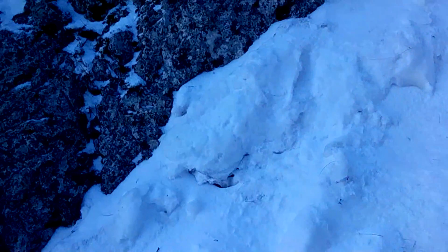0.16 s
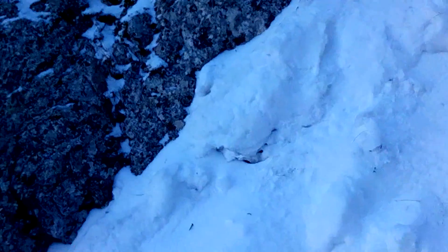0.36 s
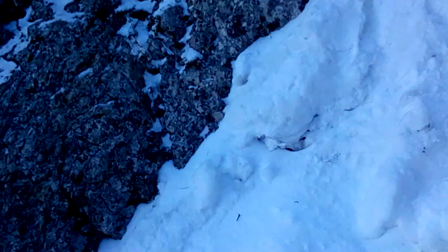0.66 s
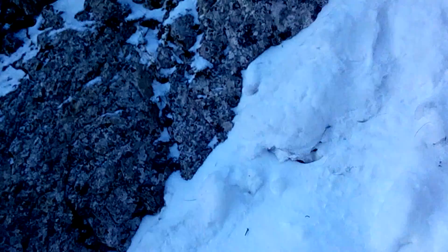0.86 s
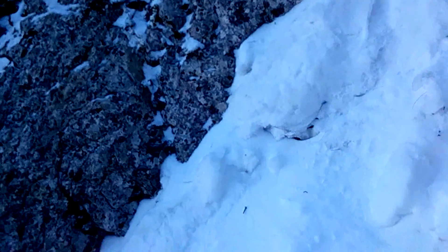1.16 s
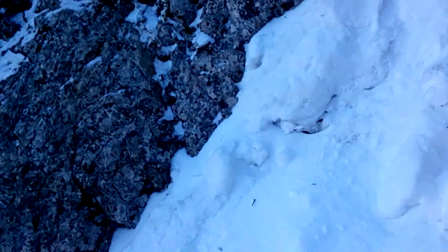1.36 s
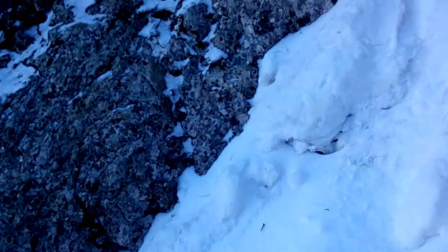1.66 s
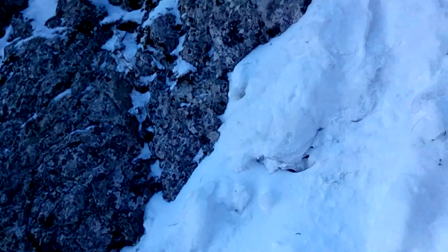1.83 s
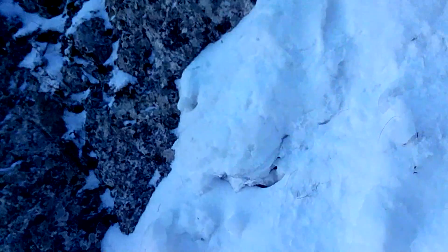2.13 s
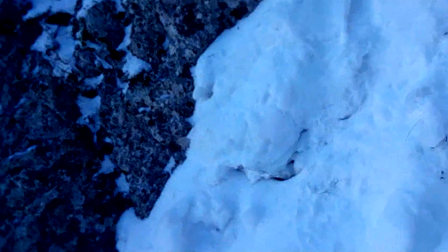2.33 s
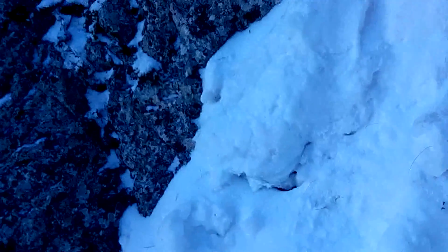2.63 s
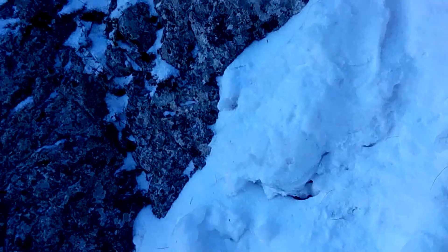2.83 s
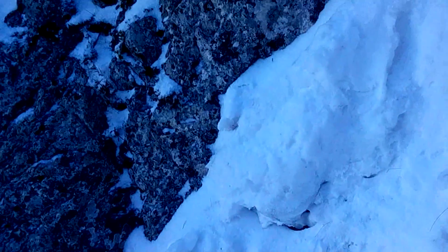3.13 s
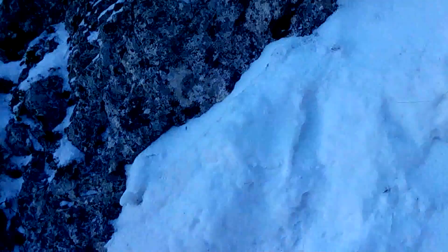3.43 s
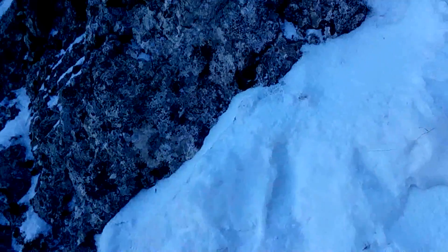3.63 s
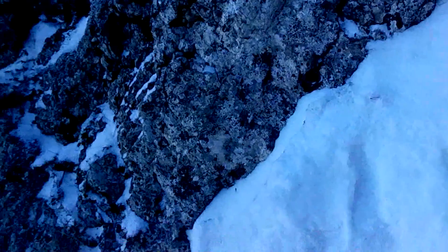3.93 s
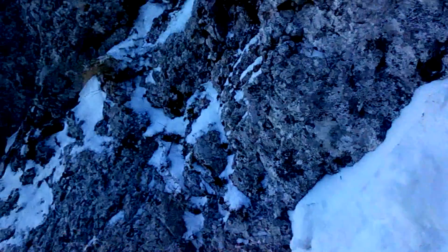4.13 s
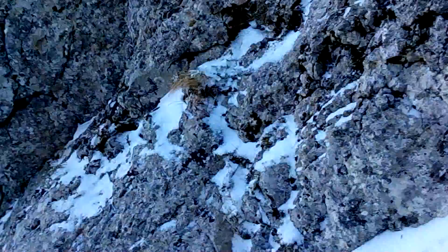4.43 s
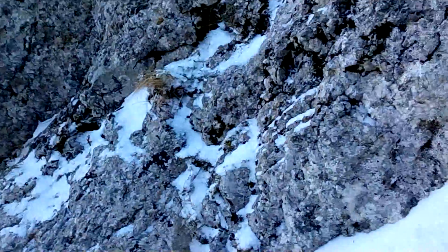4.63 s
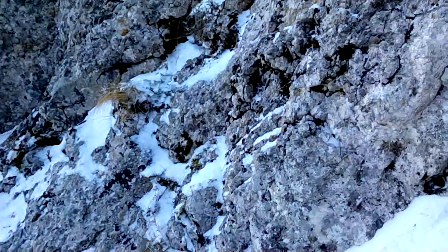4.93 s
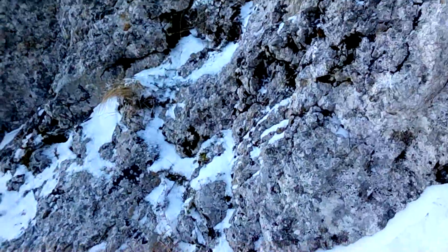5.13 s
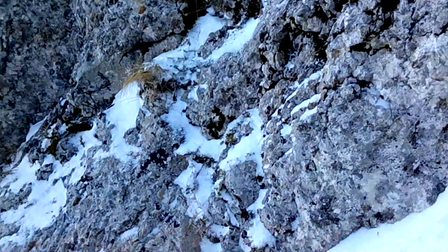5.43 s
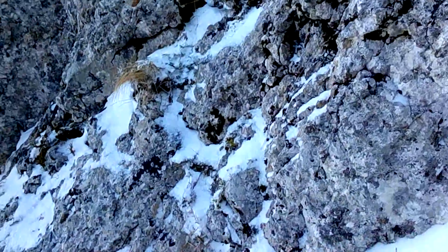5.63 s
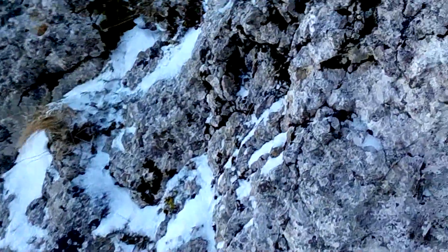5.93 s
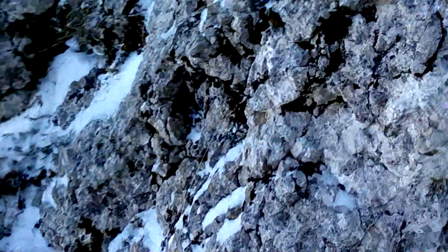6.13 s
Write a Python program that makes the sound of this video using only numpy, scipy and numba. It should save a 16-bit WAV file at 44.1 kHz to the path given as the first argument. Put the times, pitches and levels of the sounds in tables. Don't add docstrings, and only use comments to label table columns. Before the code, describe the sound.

Close on a steep icy slope, an axe scrapes and stabs at hard snow: clusters of brittle cracks, dragged steel ringing faintly, dull thumps through the camera case. Then spiked boots step up with sharp bites and short steel pings, loose grains trickling between, scraping continuing to the end over very faint air and hiss.

```python
import sys
import numpy as np
from scipy import signal
from scipy.fft import rfft, irfft, next_fast_len
from scipy.io import wavfile
from scipy.ndimage import uniform_filter1d, map_coordinates
from numba import njit

SR = 44100
rng = np.random.default_rng(int(sys.argv[2]) if len(sys.argv) > 2 else 0)


def linear_from_db(decibels):
    return 10 ** (np.asarray(decibels, float) / 20)


def store_wav(level_fs):
    pcm = np.round(np.clip(np.atleast_2d(level_fs), -1, 1) * 32767)
    wavfile.write(sys.argv[1], SR, pcm.T.astype(np.int16))


N = 276815

# (frequency [Hz], density [dB per Hz])
AIR_SPECTRUM = [(24, -28.5), (40, -1.5), (299, -7.5), (385, -13.5), (496, -30.5), (1340, -22),
                (1540, -27.5), (4670, -18), (10000, -53.5), (13000, -93.5), (22000, -120)]
# (frequency [Hz], density [dB per Hz])
CRUST_SPECTRUM = [(240, -17), (400, -11), (1610, -7), (2430, -7.5), (2750, -5), (3470, -5.5), (3870, -5),
                  (4690, -6), (5090, -3), (6080, -5), (6510, -8.5), (7880, -29.5), (9540, -28),
                  (10500, -55), (13600, -77.5), (22000, -120)]
# (frequency [Hz], side over mid [dB])
SIDE_OVER_MID = [(60, -14.5), (110, -10), (190, -19), (330, -4.5), (580, -11.5), (1030, -8), (1820, -5.5),
                 (3220, -5), (5690, 4), (10000, 5)]
# (frequency [Hz], share of the side that opposes the left port [0-1])
RIGHTWARD_SHARE = [(600, -.1), (1800, -.1), (3200, 0.26), (5500, 0.95), (9000, 0.3)]
# (start [s], end [s], fine crust [dB], sag to the end [dB], coarse lumps over fines [dB])
SCRAPES = [(0.0, 0.202, -46, 1.5, 4), (0.535, 0.566, -31, 4, -13), (0.57, 0.668, -33, -10, -7),
           (1.045, 1.108, -48, 2, -4.5), (1.131, 1.214, -43, 3.5, -9), (1.268, 1.337, -43.5, -3, 2.5),
           (1.362, 1.436, -51.5, 0, -3), (1.441, 1.524, -47, 2, 4), (1.754, 1.988, -50, 5, -5),
           (1.783, 1.82, -40, 0, -8), (1.84, 1.921, -38, 0, -9.5), (2.062, 2.237, -44, -3.5, -1),
           (2.598, 2.82, -43, -4, -6), (2.868, 2.9, -45.5, -1.5, 8), (3.022, 3.06, -48.5, -0.5, 7.5),
           (3.153, 3.189, -26, -1, -16), (3.188, 3.249, -41.5, -4.5, -0.5), (3.68, 3.712, -54, -0.5, -1),
           (4.318, 4.362, -26, 3, -17), (4.368, 4.948, -38, -13.5, -7), (4.62, 4.8, -44, -2.5, -11.5),
           (4.962, 5.172, -51, 4, -7), (5.753, 5.999, -48, -4, 0), (6.041, 6.255, -49, 3, -6)]
# (time [s], fine crust [dB], time to fade 20 dB [s], coarse lumps over fines [dB])
STABS = [(0.19, -44, .09, 0), (0.258, -47, .035, -14), (0.683, -37.5, .055, -11), (1.588, -41, 0.05, 2),
         (1.664, -30, 0.0448, -7.5), (2.256, -32.5, 0.2247, -14), (3.5, -39, 0.06, -14.5),
         (4.03, -52, 0.2, 2.5), (4.143, -25.5, .065, -10), (5.343, -49, 0.11, -1.5), (6.016, -36, 0.03, -7)]
# (peak [s], fine crust [dB], time to build 20 dB [s], time to fade 20 dB [s], coarse lumps over fines [dB])
SHOVES = [(0.568, -23, .025, .022, -18), (1.245, -35, .14, 0.1, -8), (1.831, -30, 0.03, 0.05, -10),
          (2.555, -33.5, 0.36, .07, -11), (3.3, -51, .1, .12, -5.5), (3.62, -48.5, 0.03, 0.03, 0.5),
          (4.32, -32, 0.1747, 0.03, -4), (4.575, -33, 0.1255, .05, -14), (5.21, -39, 0.06, 0.0244, -1),
          (5.475, -44, 0.04, 0.02, -7.5), (5.885, -43, 0.13, .12, -10), (6.277, -38, 0.0669, .05, 1)]
# (start [s], end [s], fine crust [dB], sag to the end [dB], coarse lumps over fines [dB])
TRICKLES = [
    (0.25, 0.505, -61, -1, -1),
    (0.745, 1.05, -66, 3.5, -2),
    (1.99, 2.06, -50, 0.5, -12.5),
    (2.82, 2.866, -54, 0, -3),
    (2.9, 3.01, -54.5, -6, -0.5),
    (3.07, 3.143, -58, -8, 0),
    (3.383, 3.49, -64, -2, 3),
    (3.723, 4.004, -64, 1.5, 0.5),
    (5.231, 5.327, -53.5, -7, -5),
    (5.5, 5.67, -68, -5, 0),
]
# (time [s], grittiness [dB])
GROUND_GRIT = [(0.17, -8.5), (0.3, 0), (0.9, 0.5), (1.09, 6.5), (1.15, 2.5), (1.45, 0), (1.9, 0), (2.2, 3),
               (2.9, 1), (3.3, 2.5), (3.58, -4), (3.7, 2), (4.13, -1.5), (4.4, 2), (5.16, 2.5), (5.4, -1.5),
               (6.28, 1)]
# (start [s], end [s], ring over crunch [dB], modes left free by the grip [Hz])
DRAGS = [
    (0, 0.256, 2, 5200),
    (1.142, 1.35, -4, 5050),
    (1.666, 1.993, 6, 3300),
    (2.267, 2.595, 4, 5000),
    (2.588, 2.837, 6.5, 3700),
    (3.028, 3.272, -3, 4530),
    (3.472, 3.647, -4, 5300),
    (4.385, 4.797, 0, 5500),
    (5.76, 5.99, -7, 5800),
    (6.019, 6.22, 2, 4050),
]
# (frequency [Hz], width [Hz], level [dB])
STEEL_MODES = [(1880, 40, 0), (2745, 62, -5), (3120, 37, -9.5), (3880, 150, -7), (5120, 72, -4.5),
               (5460, 43, -4), (5800, 70, -1)]
# (time [s], rumble [dB], knocking over that of the breaking lumps [dB])
CASE_CONTACT = [(0.15, -40, -7), (.35, -40, 6), (.5, -42, 2), (.66, -49.5, 4.5), (.85, -50.5, 1.5),
                (1.45, -45, 4), (1.8, -47, -6.5), (2.05, -52, -1.5), (2.2, -49, 0), (2.4, -49, 10),
                (2.58, -57, 13), (2.66, -60, -2.5), (2.84, -59, -2), (3.2, -47.5, 6), (3.32, -47, -3),
                (3.65, -50.5, -1), (4.15, -50, 3), (4.45, -47, 3), (4.74, -42, 1.5), (4.86, -57, -1.5),
                (5.4, -55.5, 2), (5.95, -50.5, -1), (6.12, -59, -1)]
# (time [s], peak [dB], pitch [Hz], length [cycles])
THUMPS = [(0.101, -18.5, 125, 1.7), (0.286, -15, 89.7, 1.6), (0.476, -16.5, 99, 1.4),
          (0.557, -19.5, 218, 2.3), (0.612, -25, 229, 2.9), (1.22, -26, 214, 3.1), (1.3, -27.5, 240, 2.5),
          (1.47, -27, 120, 1.7), (2.416, -19.5, 201, 1.3), (2.49, -25, 253, 2.2), (2.865, -33, 95, 1.8),
          (2.867, -24.5, 265, 2.9), (2.879, -18, 251, 2.6), (3.024, -22, 243, 2.4), (3.046, -26.5, 160, 2),
          (3.128, -32.5, 75.4, 2.4), (3.221, -26.5, 116, 2), (3.844, -11, 112, 0.98),
          (3.873, -21.5, 121, 1.2), (3.958, -31.5, 107, 3), (4.25, -17.5, 200, 1.3), (4.335, -26, 100, 2.3),
          (4.739, -21.5, 128, 2.05), (5.165, -22, 165, 2.1), (5.178, -21, 142, 1.8), (5.2, -19, 284, 2.6),
          (5.34, -34, 201, 1.8), (5.968, -29, 85, 1.5), (6.013, -28, 77, 1.7), (6.236, -28.5, 143, 1.7),
          (6.251, -26, 172, 2.2)]
# (time [s], peak [dB], centre [Hz], ring [s])
AXE_CRACKS = [(0.178, -24, 5440, 0.018), (0.564, -20, 6100, 0.014), (0.592, -9, 3400, 0.0083),
              (0.6146, -14, 5640, 0.015), (0.6826, -19, 3030, 0.022), (1.204, -16, 3200, 0.02),
              (1.265, -14, 4570, 0.015), (1.3256, -24, 4230, 0.02), (1.362, -22.5, 3700, 0.02),
              (1.59, -29, 2930, 0.017), (1.596, -31, 1000, 0.02), (1.6656, -12, 4180, 0.017),
              (1.732, -40, 5830, 0.018), (1.755, -33, 2620, 0.014), (1.831, -19, 4800, 0.025),
              (2.0735, -16, 4400, 0.024), (2.2177, -28, 3330, 0.02), (2.258, -15, 6110, 0.034),
              (2.3126, -13, 5170, 0.013), (2.467, -13, 4770, 0.02), (2.5364, -16.5, 4020, 0.02),
              (2.5505, -7, 4260, 0.029), (2.5764, -11.5, 3940, 0.026), ]
# (time [s], peak [dB], centre [Hz], ring [s])
STEP_CRACKS = [(2.8955, -24.5, 4550, 0.02), (3.0235, -32, 2870, 0.028), (3.3467, -31.5, 3150, 0.014),
               (3.4105, -36, 2240, 0.022), (3.503, -32, 5300, 0.02), (3.681, -30.5, 3570, 0.02),
               (3.811, -35, 5120, 0.024), (3.8915, -33.5, 3330, 0.014), (3.974, -29, 2880, 0.026),
               (4.0317, -27, 3330, 0.012), (4.109, -30, 2200, 0.02), (4.1452, -10.5, 5960, 0.028),
               (4.186, -19.5, 5940, 0.012), (4.2547, -21.5, 3530, 0.026), (4.3328, -3, 5120, 0.014),
               (4.563, -16, 6100, 0.011), (4.596, -29, 5030, 0.017), (4.6186, -22, 3240, 0.028),
               (4.834, -25, 3000, 0.025), (5.345, -29, 1880, 0.023), (5.4006, -29, 3170, 0.018),
               (5.4713, -19, 5770, 0.015), (6.0186, -33, 5300, 0.026), (6.1277, -31, 1700, 0.018),
               (6.2322, -21, 4170, 0.02)]
# (time [s], peak [dB], centre [Hz], ring [s])
CRACKLES = [(0.259, -33, 4970, 0.015), (0.318, -42, 4080, 0.015), (0.349, -38, 1260, 0.015),
            (0.449, -39, 4110, 0.015), (0.543, -13, 5730, 0.015), (0.657, -25, 5270, 0.015),
            (0.697, -27, 5660, 0.015), (0.781, -43, 5840, 0.015), (1.025, -36, 3140, 0.015),
            (1.066, -29, 2870, 0.015), (1.174, -25, 5560, 0.015), (1.217, -16, 3310, 0.015),
            (1.234, -19, 4910, 0.015), (1.281, -22, 1120, 0.015), (1.339, -24, 1090, 0.015),
            (1.446, -30, 3450, 0.015), (1.499, -25, 1070, 0.015), (1.519, -23, 3450, 0.015),
            (1.614, -39, 1560, 0.015), (1.785, -19, 5100, 0.015), (2.279, -16, 6140, 0.015),
            (2.355, -22, 3900, 0.015), (2.483, -20, 2880, 0.015), (2.524, -15, 3900, 0.015),
            (2.561, -15, 3910, 0.015), (2.602, -22, 3980, 0.015), (2.98, -35, 2430, 0.015),
            (3.295, -29, 5740, 0.015), (3.598, -32, 1900, 0.015), (3.616, -29, 1890, 0.015),
            (4.055, -31, 2870, 0.015), (4.218, -28, 3210, 0.015), (4.337, -8, 3950, 0.015),
            (4.344, -8, 6160, 0.015), (4.647, -22, 3190, 0.015), (4.699, -28, 3930, 0.015),
            (5.017, -32, 3850, 0.015), (5.074, -30, 5370, 0.015), (5.125, -28, 2690, 0.015),
            (5.15, -28, 3900, 0.015), (5.195, -24, 3450, 0.015), (5.386, -30, 3260, 0.015),
            (5.453, -27, 5440, 0.015), (5.522, -43, 4610, 0.015), (5.865, -26, 6210, 0.015),
            (5.95, -31, 1080, 0.015), (5.965, -30, 2240, 0.015), (5.979, -34, 2720, 0.015),
            (6.06, -30, 5460, 0.015), (6.157, -31, 5170, 0.015)]
# (start [s], end [s], level over crunch [dB], first pitch [Hz], last pitch [Hz])
CHATTER = [(0.535, 0.58, 0, 5900, 5500), (1.05, 1.105, 0, 2900, 2900), (1.08, 1.115, 0, 2150, 2100),
           (1.13, 1.2, -2, 5700, 5300), (1.14, 1.22, 0, 4900, 3500), (1.135, 1.17, -2, 2700, 3100),
           (1.22, 1.27, 0, 4700, 5300), (1.78, 1.93, 0, 1870, 1950), (1.78, 1.86, 0, 5050, 5150),
           (1.78, 1.96, 0, 4000, 3950), (1.79, 1.85, -2, 3150, 3100), (2.255, 2.3, 0, 6150, 6100),
           (2.3, 2.4, 0, 3900, 3700), (2.45, 2.6, 1, 4000, 4200), (2.62, 2.82, -2, 2000, 2100),
           (2.62, 2.82, 0, 4200, 3900), (2.65, 2.82, -3, 5400, 5400), (3.155, 3.195, 0, 5600, 5300),
           (3.2, 3.25, 0, 3400, 3700), (3.505, 3.575, 0, 6200, 5900), (4.315, 4.37, 3.5, 5000, 6400),
           (4.325, 4.35, 5, 3900, 3900), (4.5, 4.75, 0, 3200, 3200), (4.48, 4.62, 0, 5300, 5500),
           (4.55, 4.6, 0, 6000, 6300), (4.64, 4.74, -2, 4300, 4300), (5.755, 5.94, 0, 5400, 5450),
           (5.82, 5.92, 0, 5900, 6300), (5.86, 5.95, -2, 4200, 4200), (5.86, 5.93, -2, 2100, 1900),
           (6.018, 6.045, 2, 5500, 5300), (6.06, 6.2, 2, 3850, 3900), (6.08, 6.2, 0, 5500, 5100),
           (6.08, 6.2, -3, 2770, 2750)]
# (time [s], peak [dB], pitch [Hz], ring to -60 dB [s])
PINGS = [(1.663, -37, 2720, 0.1), (1.662, -24.5, 3150, 0.1), (1.666, -19, 3940, 0.058),
         (1.664, -20, 5150, 0.053), (1.671, -27.5, 1917, 0.14), (3.502, -39, 1935, 0.13),
         (3.56, -44, 1910, .1), (3.604, -34, 1890, .1), (3.502, -29, 5430, 0.09), (2.252, -23, 6180, 0.21),
         (4.146, -18, 6040, 0.13), (4.144, -9.5, 5400, 0.035), (4.35, -15, 6200, 0.14),
         (4.147, -30, 1000, .12), (4.147, -34, 1950, .12), (3.6, -38, 5430, .1), (4.146, -18, 5680, .07)]


def curve(rows, t):
    s, *columns = np.transpose(rows)
    return [np.interp(t, s, c) for c in columns]


def by_pitch(rows, hz):
    f, value = np.transpose(rows)
    return np.interp(np.log(np.maximum(hz, 1)), np.log(f), value)


def colour(x, rows):
    size = next_fast_len(N + 8192, real=True)
    hz = np.arange(size // 2 + 1) * SR / size
    return irfft(rfft(x, size) * linear_from_db(by_pitch(rows, hz)), size)[..., :N]


def unit(x):
    return x / np.sqrt(np.mean(x[0] ** 2))


@njit
def grains(start, hz, cycles, size, side):
    out = np.zeros((2, N))
    for g in range(len(start)):
        span = cycles[g] * SR / hz[g] / 3
        p = np.exp(2j * np.pi * hz[g] / SR - 1 / span)
        z = size[g] * np.e / span + 0j
        for k in range(min(int(7 * span), N - int(start[g]))):
            out[0, int(start[g]) + k] += k * z.imag
            out[1, int(start[g]) + k] += k * (z * side[g]).imag
            z *= p
    return out


def direction(hz, chance, skew=.45):
    lean = np.clip(by_pitch(RIGHTWARD_SHARE, hz) * .9, -.97, .97)
    return np.sqrt(1 - lean ** 2) * (np.sqrt(1 - skew ** 2) * chance - 1j * skew) - lean


def shards(t, size, centre_hz, spread_oct, scatter_s, cycles, count):
    u = rng.random((len(t), count, 3))
    n = rng.standard_normal((len(t), count, 2))
    order = rng.permuted(np.tile(np.arange(count), (len(t), 1)), axis=1)
    place = (order + u[..., 0]) / count
    hz = np.clip(np.reshape(centre_hz, (-1, 1)) * 2 ** (spread_oct * (2 * place - 1)), 300, 10500)
    late = -np.log(1 - (np.arange(count) + u[..., 1]) / count) * np.reshape(scatter_s, (-1, 1))
    when = t[:, None] + late
    turns = cycles * 2 ** (1.68 * u[..., 2])
    uneven = np.sign(n[..., 0]) * (0.77 + 0.38 * abs(n[..., 0]))
    weight = size[:, None] * uneven * hz / 4000 / np.sqrt(turns / 3)
    side = direction(hz, n[..., 1])
    return when.ravel(), hz.ravel(), weight.ravel(), side.ravel(), turns.ravel()


def air():
    return linear_from_db(-52.5 - 10) * unit(colour(rng.standard_normal((2, N)), AIR_SPECTRUM))


def load(t):
    onset_s, release_s = .002, 0.019
    lumps_linger = 1.27
    now = np.arange(0, N / SR, .001)
    s, db, fade_s, coarse_db = np.array(STABS).T[..., None]
    shapes = [(db, 0, s, s, onset_s, fade_s, coarse_db)]
    s, db, build_s, fade_s, coarse_db = np.array(SHOVES).T[..., None]
    shapes += [(db, 0, s, s, build_s, fade_s, coarse_db)]
    s, end, db, sag_db, coarse_db = np.array(SCRAPES + TRICKLES).T[..., None]
    sag_now_db = sag_db * np.clip((now - s) / (end - s), 0, 1)
    shapes += [(db, sag_now_db, s, end, onset_s, release_s, coarse_db)]
    fines = lumps = linear_from_db(2 * -77)
    for db, sag_db, s, end, rise_s, fall_s, coarse_db in shapes:
        before = -20 * np.maximum(s - now, 0) / rise_s
        after = sag_db - 20 * np.maximum(now - end, 0) / fall_s
        fines = fines + np.sum(linear_from_db(2 * (db + before + after)), axis=0)
        lumps = lumps + np.sum(linear_from_db(2 * (db + coarse_db + before + after / lumps_linger)), axis=0)
    load_db = np.interp(t, now, 10 * np.log10(fines))
    lumps_db = np.interp(t, now, 10 * np.log10(lumps / fines))
    grit_db = 4 + .55 * lumps_db + curve(GROUND_GRIT, t)[0]
    return load_db, lumps_db, grit_db


def crust(rate=1500, spread_db=2.0, cycles=1.92, scatter_s=.0018, patchy_db=4.2):
    t = np.sort(rng.random(int(rate * N / SR))) * N / SR
    size = linear_from_db(spread_db * np.minimum(rng.exponential(size=len(t)), 5))
    when, hz, weight, side, turns = shards(t, size, 2180.0, 2.254, scatter_s, cycles, count=8)
    weight /= np.sqrt(np.mean(size ** 2))
    load_db, lumps_db, grit_db = load(when)
    coarse = np.clip(np.log2(2300 / hz) / 1.6, 0, 1)
    middle = np.clip(np.log2(5200 / hz) / 0.21, 0, 1) * (1 - coarse)
    patches = map_coordinates(rng.standard_normal((160, 24)), [when / .04, 4 * np.log2(hz / 290)], order=1)
    weight *= linear_from_db(patchy_db * patches)
    level_db = load_db + coarse * (lumps_db + 7) + middle * (grit_db - 0.5) + 4.0
    return grains(when * SR, hz, turns, weight * linear_from_db(level_db), side)


def ring(x, hz, width):
    r = np.exp(-np.pi * width / SR)
    gain = (1 - r * r) / 2
    return signal.lfilter([gain, 0, -gain], [1, -2 * r * np.cos(2 * np.pi * hz / SR), r * r], x)


def dragged_steel(drive, reach_oct=0.77):
    t, slow = np.arange(N) / SR, np.arange(0, N / SR, .005)
    start, end, ring_db, free_hz = np.array(DRAGS).T[..., None]
    contact = np.clip(np.minimum(slow - start + 0.0065, end - slow) / 0.032, 0, 1)
    out = np.zeros((2, N))
    for hz, width, db in STEEL_MODES:
        damping_db = 7.2 * (np.log2(hz / free_hz) / reach_oct) ** 2
        free = np.sum(contact * linear_from_db(ring_db + 5.5 - damping_db), axis=0)
        shift_db = 2.5 * np.interp(slow, np.arange(80) * .09, rng.standard_normal(80))
        out += ring(drive * np.interp(t, slow, free * linear_from_db(db + shift_db)), hz, width)
    return out


def rubbing(most_db=-38):
    t = np.arange(N) / SR
    rumble_db, knock_db = curve(CASE_CONTACT, t)
    load_db, lumps_db, _ = load(t)
    lumps_db = np.maximum(load_db + lumps_db, -66)
    knock_db = knock_db - 43.5 + 0.87 * (lumps_db + 45)
    rumble_db = rumble_db + 0.29 * (uniform_filter1d(lumps_db, SR // 20) + 50.5)
    rumble_db = np.minimum(rumble_db + 3, most_db)
    out = np.zeros((2, N))
    for db, hz, octaves, rate, cycles in [(rumble_db, 90, .6, 200, 2.4), (knock_db, 250, .9, 650, 2.1)]:
        count = int(rate * N / SR)
        u, n = rng.random((2, count)), rng.standard_normal((2, count))
        pitch = hz * 2 ** (octaves * (2 * u[1] - 1))
        wavelets = grains(u[0] * N, pitch, np.full(count, cycles), n[0] * linear_from_db(1.2 * n[1]), n[1] + 0j)
        out += linear_from_db(db) * unit(wavelets)
    return out


def blows():
    t, db, hz, cycles = np.transpose(THUMPS)
    return grains(t * SR, hz, cycles, linear_from_db(db - 3.5), np.full(len(t), .7 + 0j))


def housing(side_db=-20):
    return (rubbing() + blows()) * linear_from_db([[0], [side_db]])


def cracks():
    t, db, centre_hz, ring_s = np.transpose(AXE_CRACKS + STEP_CRACKS + CRACKLES)
    db[-len(CRACKLES):] -= 4
    when, hz, weight, side, turns = shards(t, linear_from_db(db), centre_hz, 0.92, ring_s / 5, 0.69, count=16)
    fade = linear_from_db(-5.5 - 30 * (when - np.repeat(t, 16)) / np.repeat(ring_s, 16))
    weight *= fade * np.repeat(4000 / centre_hz, 16)
    tick = grains(t * SR, centre_hz, np.full(len(t), 1.1), linear_from_db(db + 4.5), direction(centre_hz, 0) / 0.6)
    return tick + grains(when * SR, hz, turns, weight, side)


def chatter(cycles=28.0, stray=.018, spread_db=3.0, count=32):
    start, end, db, from_hz, to_hz = np.array(CHATTER).T[..., None]
    u = rng.random((len(start), count))
    n = rng.standard_normal((len(start), count, 3))
    along = (np.arange(count) + u) / count
    when = start + along * (end - start)
    hz = (from_hz + along * (to_hz - from_hz)) * (1 + stray * n[..., 0])
    size = linear_from_db(db + 2.5 + load(when)[0] + spread_db * n[..., 1])
    size *= np.sin(np.pi * along) ** .3 * hz / 4000 * np.sqrt(200 * (end - start) / count)
    side = direction(hz, n[..., 2])
    return grains(when.ravel() * SR, hz.ravel(), np.full(hz.size, cycles), size.ravel(), side.ravel())


def struck_steel():
    out = np.zeros((2, N))
    age = np.arange(int(.3 * SR)) / SR
    for s, db, hz, ring_s in PINGS:
        wobble = uniform_filter1d(rng.standard_normal(len(age)), 200) * hz / 60000
        tone = np.sin(2 * np.pi * hz * age + np.cumsum(wobble))
        ping = linear_from_db(db - 60 * age / ring_s) * tone * np.minimum(age / 0.0021, 1)
        out[:, int(s * SR):int(s * SR) + len(age)] += ping * np.array([[1], [-.6]])
    return out


def scene():
    breaking = crust() + cracks()
    steel = dragged_steel(breaking) + struck_steel()
    snow = colour(breaking + steel + chatter(), CRUST_SPECTRUM) + air()
    mid, side = np.array([snow[0], colour(snow[1], SIDE_OVER_MID)]) + housing()
    return np.array([mid + side, mid - side])


def starve(x, edges_hz=(7700, 8300, 8900, 9600, 10800), keep=.42, busy_db=-47, hit_db=-32):
    block = 1536
    size = next_fast_len(N, real=True)
    mid, hz = x.mean(axis=0), np.arange(size // 2 + 1) * SR / size
    treble = np.sqrt(uniform_filter1d(np.diff(mid, prepend=0) ** 2, block))[block // 2::block]
    busy = (treble > linear_from_db(busy_db)) & (treble < linear_from_db(hit_db))
    lines = rfft(mid, size)
    for lo, hi in zip(edges_hz, edges_hz[1:]):
        lost = np.resize(np.repeat(busy & (rng.random(len(busy)) > keep), block), N)
        band = irfft(lines * (hz >= lo) * (hz < hi), size)[:N]
        x = x - uniform_filter1d(1. * lost, 256) * band
    return x


def low_pass(x):
    return signal.sosfilt(signal.butter(12, 10650, fs=SR, output="sos"), x)


def record(dry):
    rounded = np.tanh(1.379 * dry) / 1.208
    bass_cut = signal.butter(3, 48, "high", fs=SR, output="sos")
    mix = starve(signal.sosfilt(bass_cut, rounded))
    return low_pass(mix)


dry = scene()
out = record(dry)
store_wav(out)
```